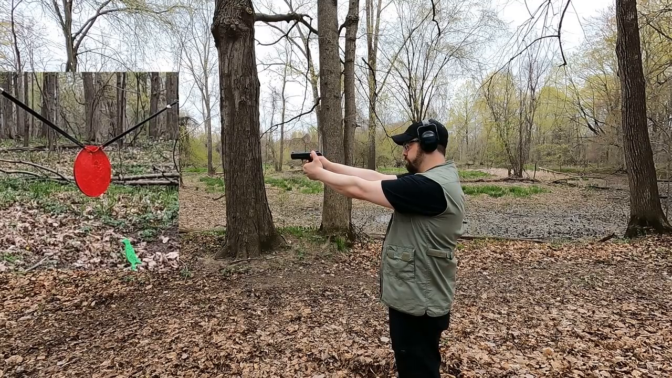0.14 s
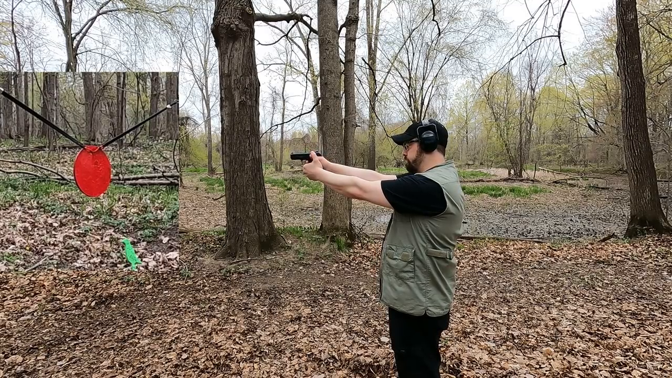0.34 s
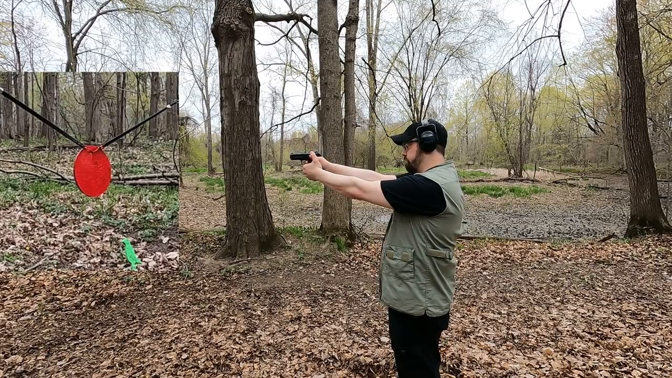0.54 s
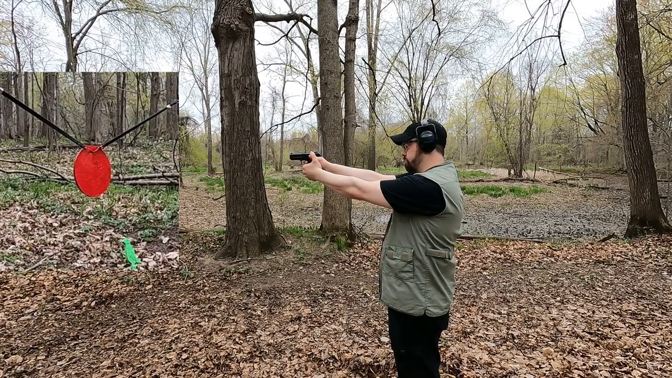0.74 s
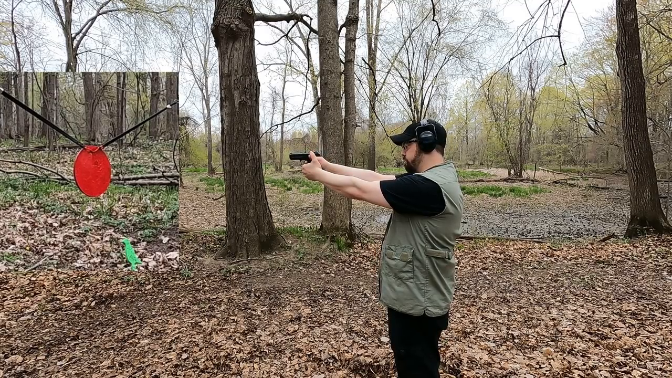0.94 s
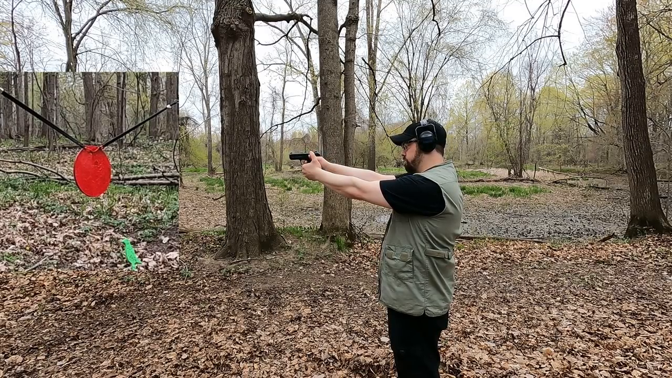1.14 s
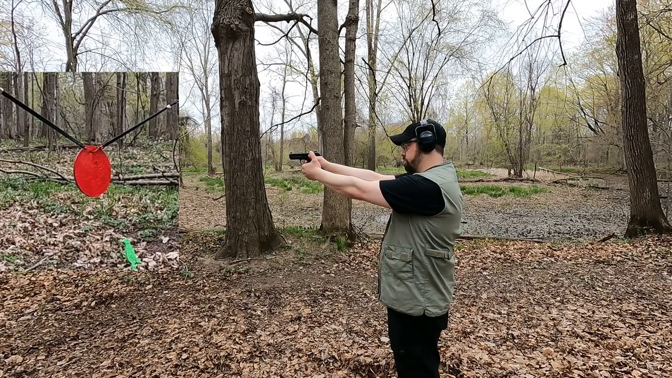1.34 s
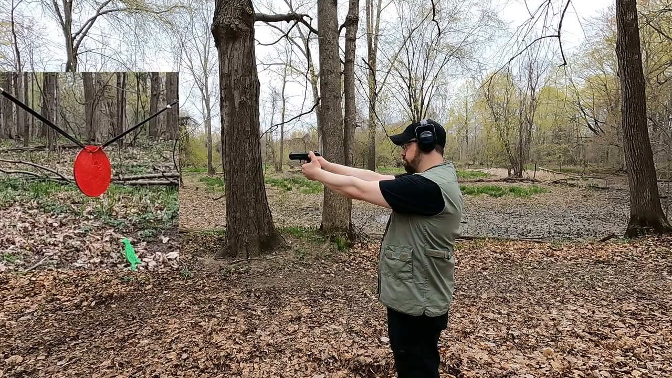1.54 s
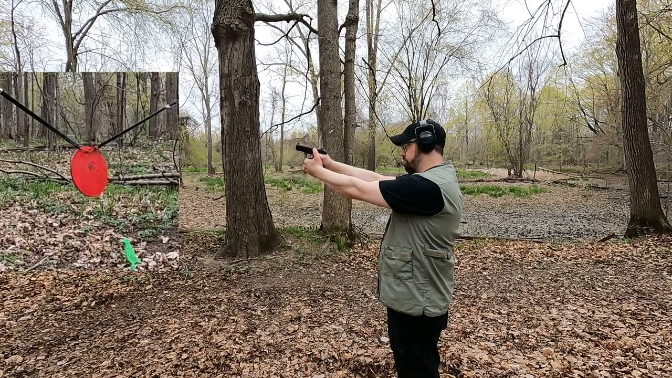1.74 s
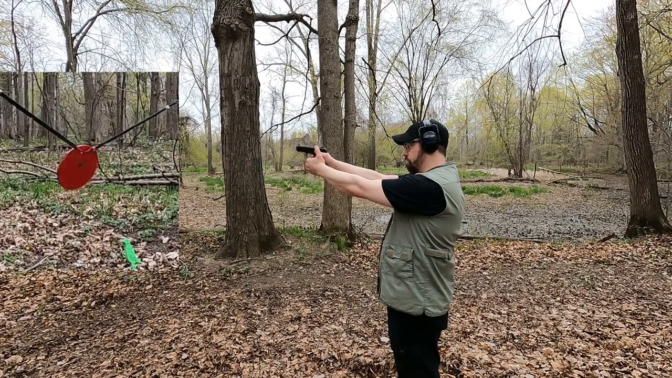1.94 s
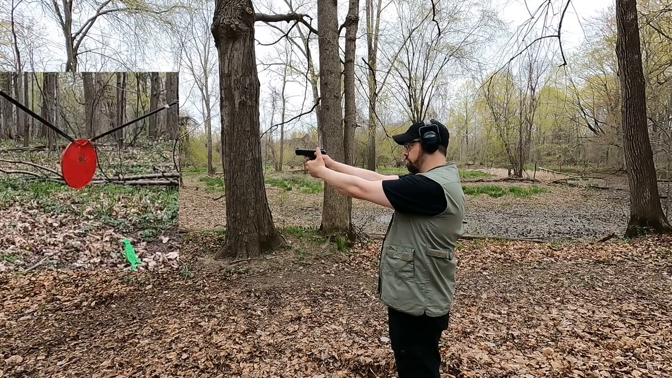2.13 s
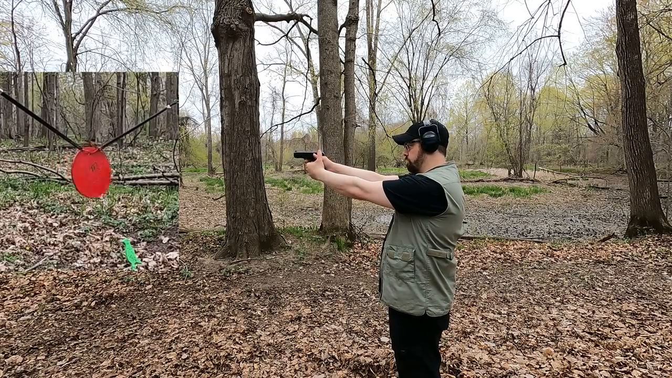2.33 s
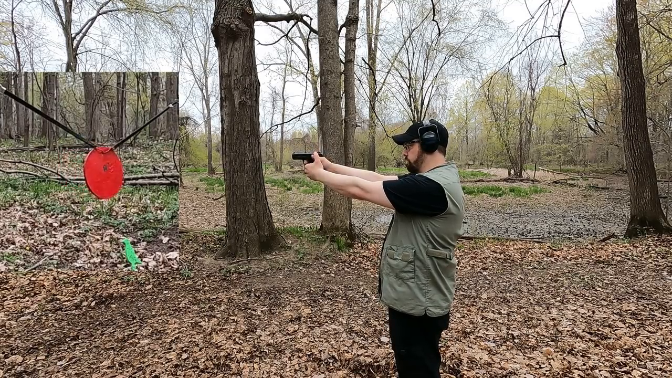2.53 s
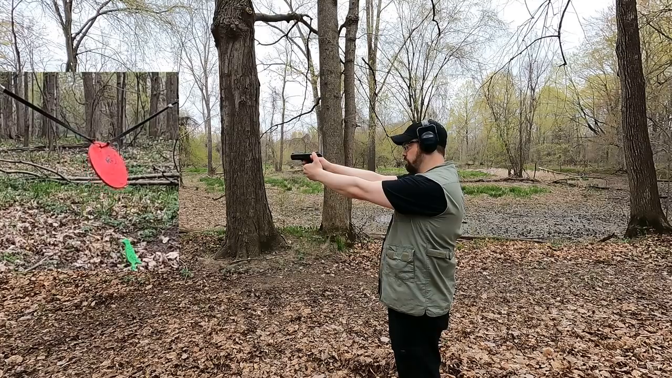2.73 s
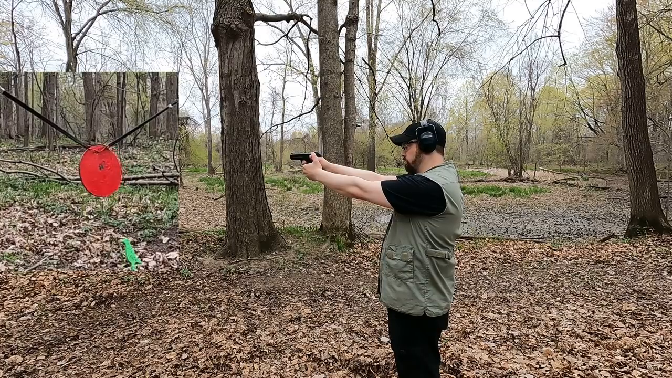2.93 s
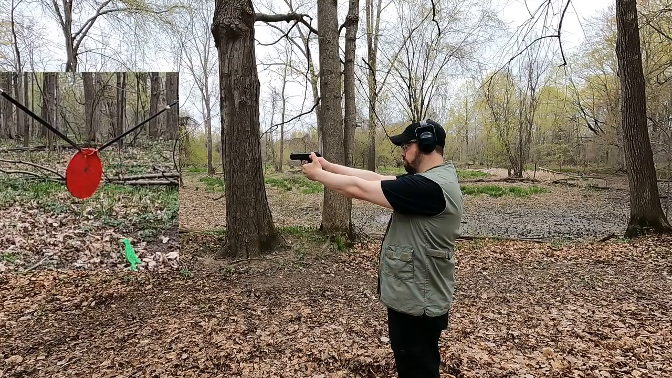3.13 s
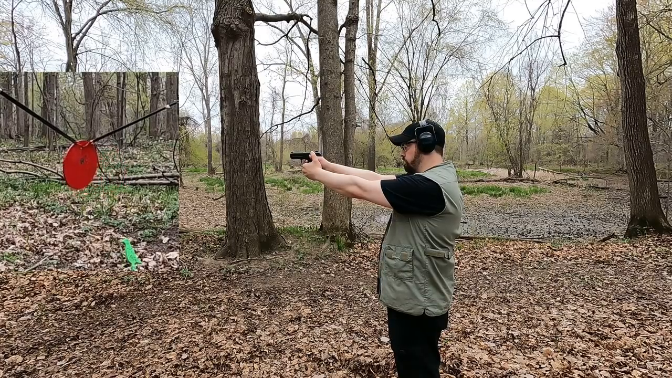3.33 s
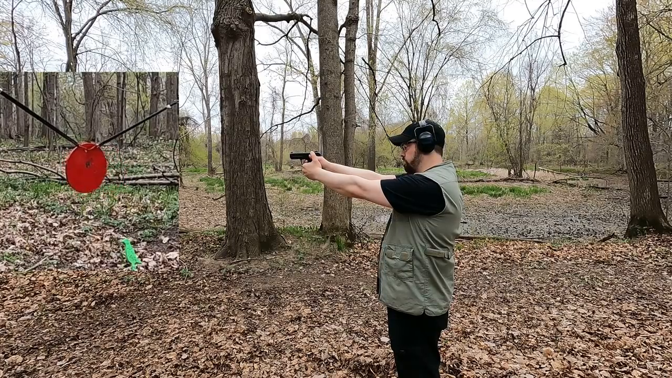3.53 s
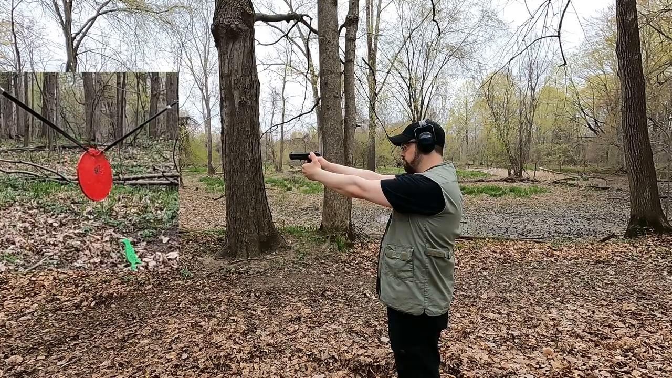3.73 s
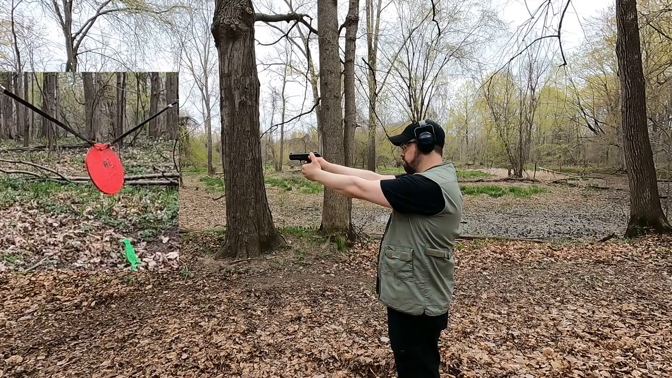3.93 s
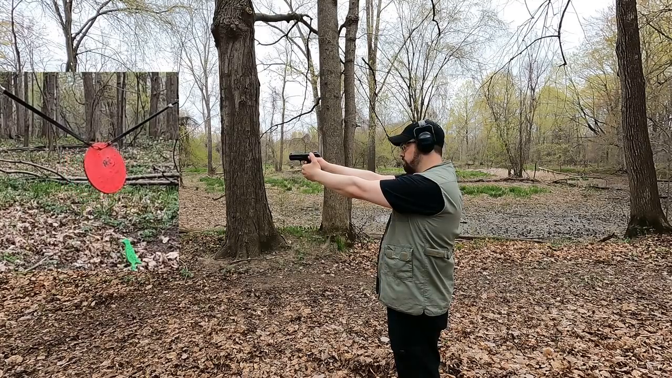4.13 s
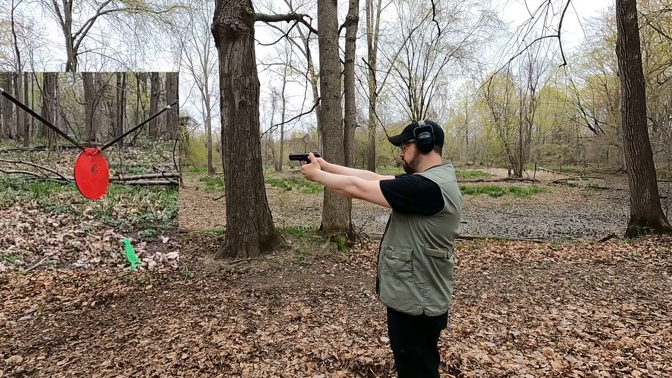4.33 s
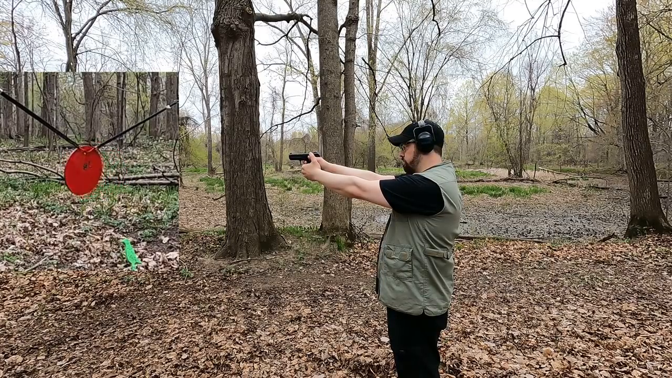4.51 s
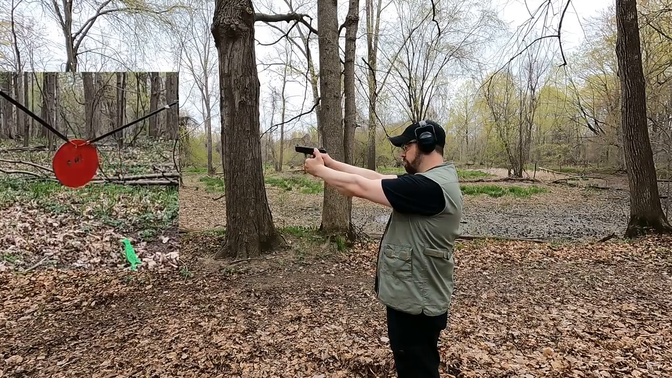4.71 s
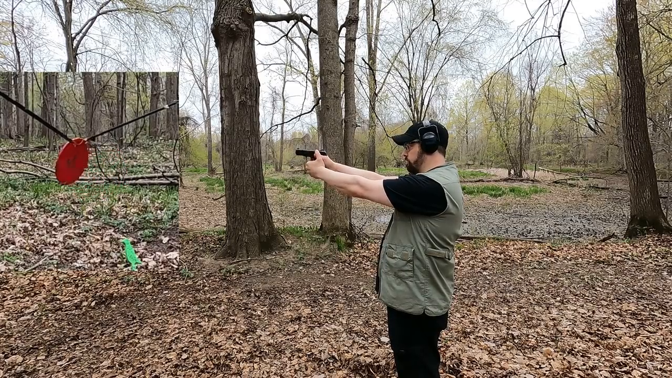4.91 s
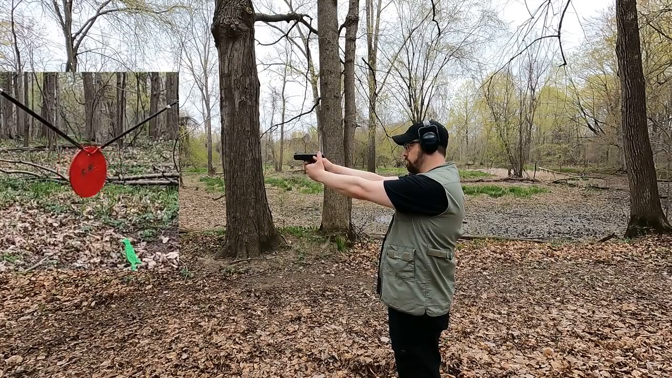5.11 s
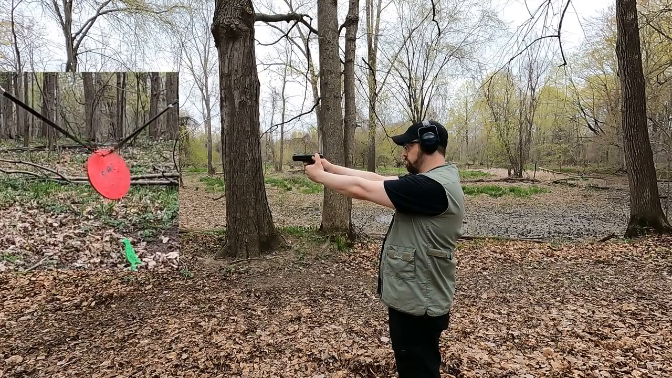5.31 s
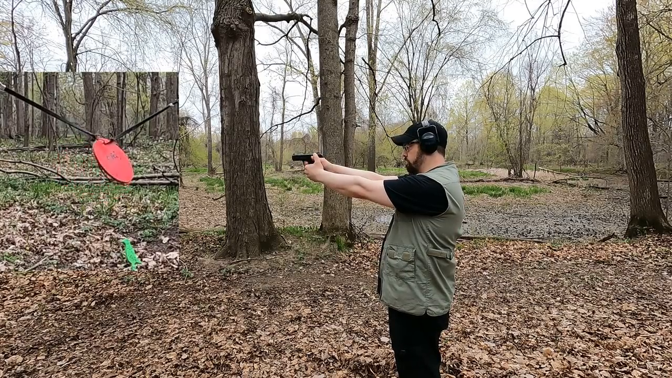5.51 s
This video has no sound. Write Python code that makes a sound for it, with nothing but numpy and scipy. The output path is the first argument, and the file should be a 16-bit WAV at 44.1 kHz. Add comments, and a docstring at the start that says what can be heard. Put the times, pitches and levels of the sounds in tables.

```python
"""A spring wood: two pistol shots, each answered by a hanging steel gong.
Under them sit a low hush with puffs of breeze, rustling clothes and dry leaves, and two far birds.
A time-stretch effect smears each shot into a quick, swelling flutter of repeats.
The shots overload the microphone, then roll through the trees and return from far off.
The bullet splashes on the plate, which rings in beating pairs of modes."""
import sys
import numpy as np
from scipy import signal
from scipy.fft import rfft, irfft
from scipy.io import wavfile

SR = 44100
rng = np.random.default_rng(int(sys.argv[2]) if len(sys.argv) > 2 else 0)


def wav_record(signal):
    """Record a signal, one row per channel, as 16-bit PCM in the file named by sys.argv[1]."""
    frames = np.transpose(np.atleast_2d(signal))
    bounded = np.clip(frames, -1, 1)
    # unit amplitude maps onto the largest positive 16-bit level
    quanta = np.round(bounded * 32767).astype(np.int16)
    wavfile.write(sys.argv[1], SR, quanta)


N = 249600
TIME = np.arange(N) / SR

# Spectra give relative level per Hz; pan is left minus right.
# stereo image of the noise beds: f/Hz, left-right correlation
STEREO_LIKENESS = [(60, 0.97), (300, 0.9), (640, .92), (1400, 0.72), (3100, 0.29), (7000, 0.42),
                   (15000, .2)]
# tone of the still wood: f/Hz, level/dB
AIR_SPECTRUM = [(25, -13.5), (50, -6), (100, -17.5), (190, 0), (270, -11.5), (400, -14), (800, -23),
                (1250, -14.5), (1900, -27), (2600, -23.5), (3800, -34.5), (7000, -33.5), (10000, -52.5),
                (15800, -61)]
# fader ride of the low hush, dipping after the first shot: t/s, level/dB
HUSH_RIDE = [(0, -54.5), (1.8, -55), (3.1, -66.5), (4.2, -57), (5.66, -60)]
# puffs of breeze on the microphone: t/s, level/dB
BREEZE_PUFFS = [(.1, -63), (.6, -55), (1.15, -52), (1.38, -56), (1.72, -55)]
# tone of cloth and dry leaves: f/Hz, level/dB
RUSTLE_SPECTRUM = [(1000, -23.5), (2500, -13), (4000, -7), (7000, -3), (9500, -20), (13000, -16.5),
                   (16000, -31)]
# ticks of leaves and clothing: t/s, relative peak/dB, pan/dB
DRY_TICKS = [(0.2857, -56, -0.5), (2.8553, -43, -3), (2.9522, -50.5, 1.0), (3.5653, -56, 6),
             (3.6132, -55, 5), (4.0014, -54, 1.0), (4.0515, -51.5, 3.5), (4.132, -42, 0.0),
             (4.5663, -50, 4.0)]
# moves of the shooter's sleeve: t/s, level/dB
SLEEVE_SWELLS = [(2.86, -67), (4.055, -62.5), (4.14, -65), (4.58, -67)]
# tone of the wash behind the birdsong: f/Hz, level/dB
SONG_SPECTRUM = [(1500, -44.5), (2000, -10.5), (2400, -4), (3000, -2.5), (3500, -23), (4500, -42.5)]
# slurred notes of the first bird: t/s, f/Hz, glide/Hz, relative level/dB
SONG_SLURS = [(.57, 2345, -240, -58.5), (.625, 2890, 598, -57.5), (.73, 2360, -180, -59.5),
              (.905, 2310, -300, -59.5), (1.06, 2940, 279.5, -58), (1.195, 2224, -550, -64.5),
              (1.32, 2365, 140.5, -55), (1.45, 2860, 499.5, -55.5), (1.575, 2290, -260, -57)]
# repeated pip of the second bird: t/s, level/dB
BIRD_PIPS = [(3.288, -59), (3.465, -59), (3.652, -59), (3.855, -58.5), (4.010, -59), (4.175, -54)]
# shot cues: t/s, report trim/dB, echo trim/dB
SHOT_CUES = [(1.8490, 2, 1), (4.753, -1, -1)]
# tone of the muzzle blast: f/Hz, level/dB
BLAST_SPECTRUM = [(30, -6), (60, -3), (100, 1), (150, 3), (230, 2), (380, -9.5), (520, -0.5), (760, -7.5),
                  (1100, -3.5), (1900, -17.5), (2700, -15), (3700, -15.5), (4700, -15.5), (6000, -23),
                  (8000, -21), (11000, -34.5), (15500, -54.5)]
# scatter from nearby leaf litter, also the tone of gas spit and bullet splash: f/Hz, level/dB
LITTER_SPECTRUM = [(40, -2.5), (140, 16), (400, 9), (1200, -4), (2500, -22.5), (5000, -19), (8000, -19.5),
                   (15000, -47.5)]
# slaps off trunks and banks: delay/s, relative level/dB, low cut/Hz, high cut/Hz
TRUNK_SLAPS = [(0.016, -8, 500, 4500), (0.021, -5.5, 150.4, 4500), (.029, -17.5, 250, 2500),
               (.043, -19.5, 703, 2500), (.098, -16, 69.1, 900), (.195, -12, 70, 177.7),
               (.215, -9, 70, 180), (.315, -11, 600, 1800), (.54, -19.5, 448.3, 2460)]
# tone of the wood's echo: f/Hz, level/dB, extra loss with travel/(dB/s)
ECHO_SPECTRUM = [(39.4, -11, 47), (105.6, 16.5, 65), (198, -1, 37), (330, -4.5, 0.5), (530, -2.5, -2.5),
                 (1020, 0, 0), (1820, -10.5, 2.5), (2550, -10, 7), (3870, -13.5, 14.5), (6300, -12.5, 28),
                 (8900, -23.5, 54), (15000, -44.5, 59)]
# belts of trees that roll the shot back, near to far: delay/s, level/dB, rise/s, depth/s
TREE_BELTS = [(0, -20, .01, .05), (.14, -22.5, 0.092, 0.49), (.335, -18.7, 0.13, 0.33),
              (1.852, -34, 0.12, .36)]
# bullets on the gong: t/s, splash/dB, ring/dB, delay until the swinging plate faces the microphone/s
GONG_HITS = [(1.981, -15, -0.5, 0.028), (4.884, -16, -1.5, 0.12)]
# modes of the plate: f/Hz, t60/s, level in first hit/dB, level in second hit/dB, pan/dB
GONG_MODES = [(1341, 1.7, -21, -26, 6), (2997, 1.8, -37, -54, 1), (3022, 1.5, -49, -28.5, 6),
              (4226, 1.4, -58, -58, 0), (5103, 1.25, -50, -34, 2), (5567, 1.35, -37.5, -48, -1),
              (5588, 1.0, -41, -57, 5), (6056, 1.2, -62, -53, 3), (7526, .8, -52, -42, 8),
              (8446, .8, -44, -62, 2), (8469, .7, -53, -60, 3), (8538, .68, -62, -30, 7),
              (10250, .5, -59, -57, 4), (11745, .5, -56, -46, 16), (11815, .5, -54, -53, 16),
              (12166, .45, -54, -55, 14), (12188, .45, -53, -52, 14), (12254, .5, -58, -52, 16),
              (15465, .6, -78, -70, 5)]
# share of the ring that comes by way of the trees: f/Hz, level/dB
RING_SCATTER = [(1300, -2), (3000, 4), (5500, 11.5), (12000, 5)]


def from_db(db):
    """Decibels to gain."""
    return 10 ** (np.asarray(db) / 20)


def at_hz(points, hz, column=1):
    """Read one column of a spectrum on a log-frequency axis."""
    table = np.array(points)
    return np.interp(np.log(np.maximum(hz, 1)), np.log(table[:, 0]), table[:, column])


def pan(side_db):
    """Left and right gains; positive leans left."""
    return from_db(np.array([[.5], [-.5]]) * side_db)


def add(out, s, sound):
    """Mix a sound in at time s."""
    start = int(round(s * SR))
    part = sound[..., :max(N - start, 0)]
    out[:, start:start + part.shape[-1]] += part


def high_cut(x, hz):
    """Second-order low-pass."""
    return signal.sosfilt(signal.butter(2, hz, fs=SR, output="sos"), x)


def low_cut(x, hz):
    """Second-order high-pass."""
    return signal.sosfilt(signal.butter(2, hz, "high", fs=SR, output="sos"), x)


def drift(rate_hz, size=N):
    """Smooth random modulator with a spread of 1."""
    hop, settle = 40, 2000
    pole = np.exp(-2 * np.pi * hop * rate_hz / SR)
    white = rng.standard_normal(size // hop + 2 * settle + 2)
    slow = signal.lfilter([1], [1, -2 * pole, pole * pole], white)[settle:]
    return np.interp(np.arange(size) / hop, np.arange(len(slow)), slow / slow.std())


def swells(events, attack_s, release_s):
    """Envelope that rises to each event (t/s, level/dB) and dies away after it."""
    power = 0
    for s, db in events:
        fade = np.maximum((s - TIME) / attack_s, (TIME - s) / release_s)
        power = power + (from_db(db) * np.exp(-fade)) ** 2
    return np.sqrt(power)


def noise_bands(spectrum, grain_db, count=22):
    """Yield (f/Hz, grainy stereo noise) for each band of a spectrum; together they have rms 1."""
    edges = np.geomspace(25, 16500, count + 1)
    centres = np.sqrt(edges[1:] * edges[:-1])
    share = from_db(at_hz(spectrum, centres)) * np.sqrt(np.diff(edges))
    white = rng.standard_normal((2, 2, N)) * from_db(grain_db * drift(230))
    for k, hz in enumerate(centres):
        band = signal.sosfilt(signal.butter(3, edges[k:k + 2], "band", fs=SR, output="sos"), white[k % 2])
        mid, side = band / band.std() * share[k] / np.linalg.norm(share)
        alike = at_hz(STEREO_LIKENESS, hz)
        yield hz, np.sqrt((1 + alike) / 2) * mid + np.sqrt((1 - alike) / 2) * side * np.array([[1], [-1]])


def pulse(spectrum, size=2048):
    """The tightest click with this spectrum (minimum phase); peak 1."""
    magnitude = from_db(at_hz(spectrum, np.fft.rfftfreq(size, 1 / SR)))
    cepstrum = irfft(np.log(magnitude))
    cepstrum[1:size // 2] *= 2
    cepstrum[size // 2 + 1:] = 0
    shape = irfft(np.exp(rfft(cepstrum)))
    return shape / np.abs(shape).max()


def crack(spectrum, rough, t60, width, size=2048):
    """A pressure jump with a short turbulent tail that spreads in stereo."""
    noise = rng.standard_normal(size) + width * rng.standard_normal((2, size))
    burst = noise * from_db(-60 * TIME[:size] / t60)
    drive = rough * (burst - high_cut(burst, 400))
    drive[:, 0] += 1
    return signal.fftconvolve(drive, pulse(spectrum)[None])[:, :size]


def air(waver_db=4, bass_hz=300, treble_db=-61, lull_db=-15):
    """The bed: the hush of the wood, uneven in the bass, and soft puffs of breeze on the microphone."""
    ride_db = np.interp(TIME, *np.transpose(HUSH_RIDE))
    hush = 0
    for hz, band in noise_bands(AIR_SPECTRUM, grain_db=-.5):
        low = 1 / (1 + (hz / bass_hz) ** 2)
        hush = hush + band * from_db(low * (ride_db + waver_db * drift(8)) + (1 - low) * treble_db)
    noise = rng.standard_normal(N) + .4 * rng.standard_normal((2, N))
    rumble = low_cut(high_cut(noise, 75), 35)
    breeze = np.hypot(from_db(ride_db + lull_db), swells(BREEZE_PUFFS, attack_s=.047, release_s=.07))
    return (hush + breeze * rumble / rumble.std()) * pan(-2.2)


def rustle(rest_db=-78, tick_trim_db=1, faint_per_s=3, faint_db=-57, faint_pan_db=7):
    """Dry little snaps of leaves and cloth over the grainy hiss of a moving sleeve."""
    motion = np.hypot(from_db(rest_db), swells(SLEEVE_SWELLS, attack_s=.015, release_s=.1))
    out = motion * sum(band for _, band in noise_bands(RUSTLE_SPECTRUM, grain_db=1.5)) * pan(3)
    aim_from, aim_to = SHOT_CUES[0][0], SHOT_CUES[-1][0]   # faint ticks while the aim is steadied
    chances = TIME[rng.random(N) < faint_per_s / SR]
    faint = [(s, faint_db, faint_pan_db) for s in chances if aim_from < s < aim_to]
    for s, peak_db, side_db in list(DRY_TICKS) + faint:
        snap = crack(RUSTLE_SPECTRUM, rough=.51, t60=.025, width=.65)
        add(out, s, from_db(peak_db + tick_trim_db) * pan(side_db) * snap / np.abs(snap).max())
    return out


def whistle(length_s, hz, glide_hz, arch_hz, warble_hz):
    """One bird note: a sine that glides, arches and wavers as it swells and fades."""
    progress = np.linspace(0, 1, int(length_s * SR))
    arch = np.sin(np.pi * progress)
    warble = warble_hz * drift(80, SR)[:len(progress)]
    pitch = hz + glide_hz * (progress - .5) + arch_hz * (arch - .5) + warble
    return arch * np.sin(2 * np.pi * np.cumsum(pitch) / SR)


def birds(song_direct_db=-6, wet=.45, t60=.92, crest_s=2, rise_db_per_s=9.5, fade_db_per_s=65):
    """Two far birds, blurred by the trees; most of the song arrives as a wash in one crescendo."""
    song, pips = np.zeros((2, 2, N))
    for s, hz, glide_hz, level_db in SONG_SLURS:
        add(song, s, from_db(level_db) * whistle(.07, hz, glide_hz, arch_hz=-40, warble_hz=45))
    for s, level_db in BIRD_PIPS:
        add(pips, s, from_db(level_db) * whistle(.041, hz=2980, glide_hz=0, arch_hz=200, warble_hz=28))
    trees = rng.standard_normal((2, SR)) * from_db(-60 * TIME[:SR] / t60)
    reverb = signal.fftconvolve(song + .7 * pips, trees / np.linalg.norm(trees[0]), axes=1)[:, :N]
    wash = signal.fftconvolve(rng.standard_normal((2, N)), pulse(SONG_SPECTRUM)[None])[:, :N]
    wash_db = -78.5 + rise_db_per_s * np.minimum(TIME, crest_s)
    wash_db -= fade_db_per_s * np.maximum(TIME - crest_s, 0)
    wash *= from_db(wash_db + 3 * drift(15)) / wash.std()
    return from_db(song_direct_db) * song + pips + wet * reverb + wash


def stretch_flutter_db(delay, crest_db=8.5, swell_db_per_s=380, collapse_db_per_s=2599.5):
    """Level of a time-stretch repeat, timed from the shot's peak: soft lead-in, swell, sudden drop."""
    lead_in_db = -12.5 * (delay < -.024)
    return crest_db + min(swell_db_per_s * delay, -collapse_db_per_s * delay) + lead_in_db


def report(trim_db=2.5, stretch_rate_hz=187.5, stretch_turn_cycles=.793, repeat_top_hz=6500, spit_db=-12):
    """Each muzzle blast, smeared into a flutter by a time-stretch effect, and its slaps off trunks."""
    out = np.zeros((2, N))
    for s, shot_db, _ in SHOT_CUES:
        blast = crack(BLAST_SPECTRUM, rough=.056, t60=.043, width=.49)
        analytic = signal.hilbert(np.pad(blast, ((0, 0), (SR // 100, 0))))   # 10 ms of pre-roll
        for k in range(-8, 3):   # the time-stretch effect repeats the shot, shifting each copy's phase
            delay = k / stretch_rate_hz
            gain = from_db(trim_db + shot_db + stretch_flutter_db(delay))
            repeat = np.real(analytic * np.exp(2j * np.pi * stretch_turn_cycles * k))
            gas_spit = low_cut(crack(LITTER_SPECTRUM, rough=.4, t60=.015, width=.86), 1100)
            if k == 0:   # the peak is the brightest
                gas_spit *= 1.5
            else:
                repeat = high_cut(high_cut(repeat, repeat_top_hz), repeat_top_hz)
                gas_spit = .6 * high_cut(gas_spit, repeat_top_hz)
            add(out, s + delay - .01, gain * repeat)
            add(out, s + delay, gain * from_db(spit_db) * gas_spit)
        for delay, trunk_db, low_hz, top_hz in TRUNK_SLAPS:
            smear_s = .013 + .36 * delay   # far slaps arrive by many paths
            slap = crack(BLAST_SPECTRUM, rough=.19, t60=smear_s, width=1, size=8192)
            slap = low_cut(high_cut(slap, top_hz), low_hz)
            add(out, s + delay, from_db(trim_db + shot_db + trunk_db) * pan(3.4) * slap)
    bass = signal.sosfiltfilt(signal.butter(1, 400, fs=SR, output="sos"), out)
    return bass * pan(-5) + (out - bass) * pan(.6)   # body to the right, crack to the left


def thump(level_db=-15, push_s=.0027):
    """The low end: the gas ball of each shot gives one slow push and a longer suction."""
    out, t = np.zeros((2, N)), TIME[:SR // 10]
    pressure = (1 - t / push_s) * np.exp(-t / push_s)
    wave = low_cut(high_cut(pressure, 120), 47)
    for s, _, _ in SHOT_CUES:
        add(out, s - push_s, from_db(level_db) * wave / wave.max())
    return out


def roll(age, spreading_db_per_decade=29.5, loss_db_per_s=5):
    """Envelope of the echo: each belt of trees swells in, then fades as the sound spreads into it."""
    power = 0
    for delay, level_db, rise_s, depth_s in TREE_BELTS:
        late = np.maximum(age - delay, 0)
        rise = np.exp(np.minimum(age - delay, 0) / rise_s)
        fade_db = spreading_db_per_decade * np.log10(1 + late / depth_s) + loss_db_per_s * late
        power = power + (from_db(level_db - fade_db) * rise) ** 2
    return np.sqrt(power)


def wood_echo(patchy_db=1.28, litter_db=-24, litter_t60=.39):
    """The tail: countless trunks return the shot; soft ground eats the bass and the air the treble."""
    out = np.zeros((2, N))
    ages = np.array([np.maximum(TIME - s, 0) for s, _, _ in SHOT_CUES])
    sends = np.array([from_db(echo_db) * (TIME > s) for s, _, echo_db in SHOT_CUES])
    rolls = sends * roll(ages)
    for hz, band in noise_bands(ECHO_SPECTRUM, grain_db=.5):
        loss_db = at_hz(ECHO_SPECTRUM, hz, column=2) * ages
        out += band * sum(rolls * from_db(-loss_db)) * from_db(patchy_db * drift(10))
    litter = sum(sends * from_db(litter_db - 60 * ages / litter_t60))
    out += litter * sum(band for _, band in noise_bands(LITTER_SPECTRUM, grain_db=-1.5))
    return out * pan(.65)


def gong(shimmer_hz=8.8, build_s=.078, beam_hz=3100, left_lead_s=4e-5, facing_db=5, sweep_s=.056):
    """The bullet splashes and the plate rings, first direct, then shimmering through the trees."""
    out, t = np.zeros((2, N)), TIME[:2 * SR]
    attack = 1 - np.exp(-t / .0019)
    for hit, (s, splash_db, ring_db, facing_s) in enumerate(GONG_HITS):
        splash = low_cut(crack(LITTER_SPECTRUM, rough=.42, t60=.047, width=.94), 1260)
        add(out, s, from_db(splash_db) * splash)
        for hz, t60, *levels_db, side_db in GONG_MODES:
            # high modes radiate in narrow beams that sweep past as the plate swings
            beam = min((hz / beam_hz) ** 2, 1)
            facing = 2 * np.exp(-((t - facing_s) / sweep_s) ** 2) - 1
            image = pan(side_db) * np.exp(2j * np.pi * hz * left_lead_s * np.array([[1], [0]]))
            direct = image * from_db(beam * facing_db * facing - 60 * t / (.79 * t60))
            rate_hz = shimmer_hz * (1 + beam)
            paths = np.array([drift(rate_hz, len(t)) + 1j * drift(rate_hz, len(t)) for _ in range(3)])
            shimmer = .6j + .4 * (paths[2] + paths[:2])   # one shared path and one per channel
            bloom = from_db(at_hz(RING_SCATTER, hz) - 60 * t / t60) * (1 - np.exp(-t / build_s))
            scattered = bloom * shimmer * pan(side_db / 2)
            ring = np.sqrt(2) * np.imag((direct + scattered) * np.exp(2j * np.pi * hz * t))
            add(out, s, from_db(ring_db + levels_db[hit]) * attack * ring)
    return out


def scene():
    """The mix: shots, echoes and gong up front, the quiet wood behind."""
    return report() + thump() + wood_echo() + gong() + air() + birds() + rustle()


def record(dry):
    """The reports overload into soft clipping; a steep filter cuts the top above 16 kHz."""
    clipped = dry / (1 + dry ** 4) ** (1 / 4)
    return signal.sosfilt(signal.cheby2(18, 60, 16000, fs=SR, output="sos"), clipped)


dry = scene()
out = record(dry)
wav_record(out)
```